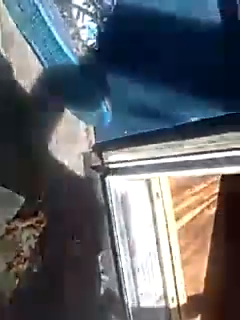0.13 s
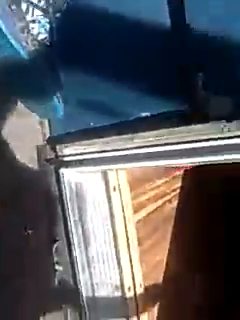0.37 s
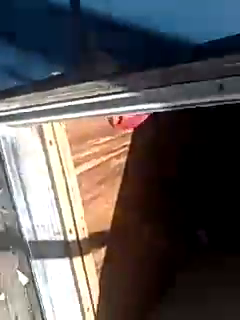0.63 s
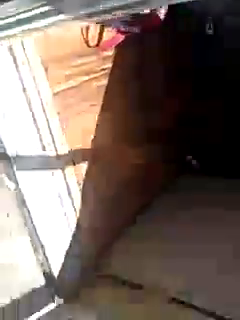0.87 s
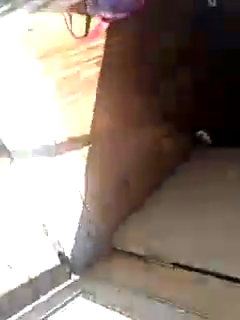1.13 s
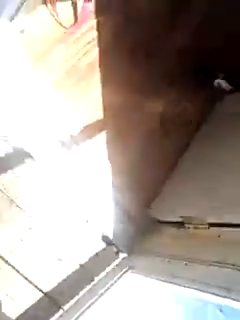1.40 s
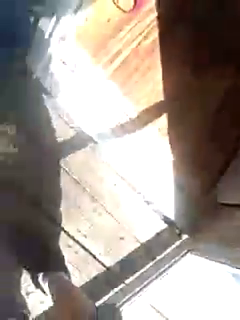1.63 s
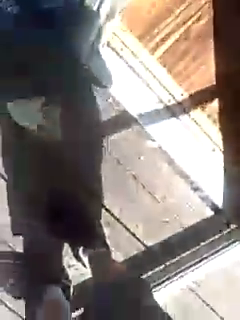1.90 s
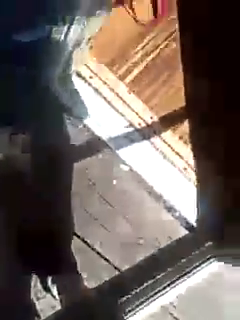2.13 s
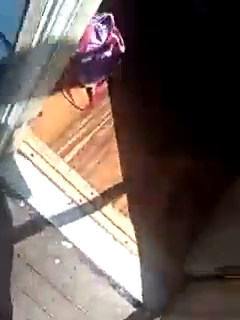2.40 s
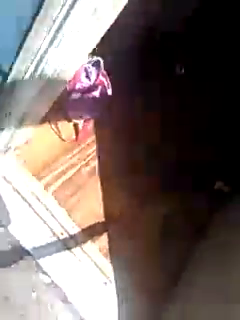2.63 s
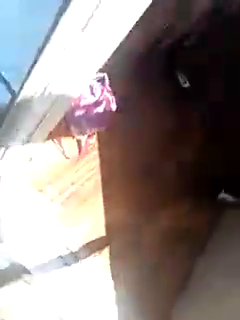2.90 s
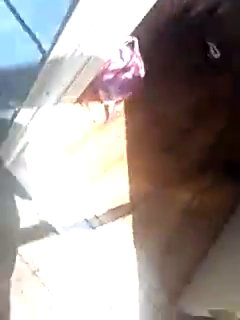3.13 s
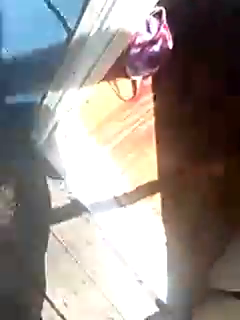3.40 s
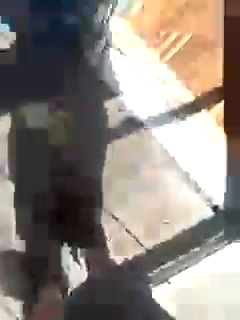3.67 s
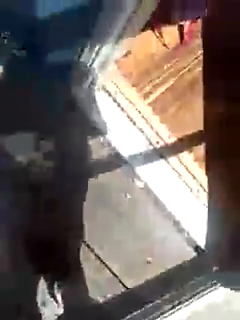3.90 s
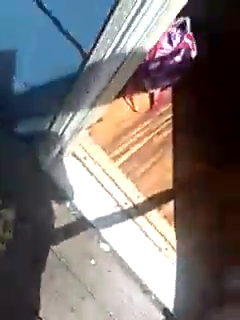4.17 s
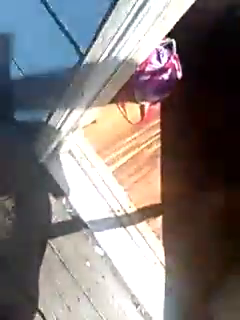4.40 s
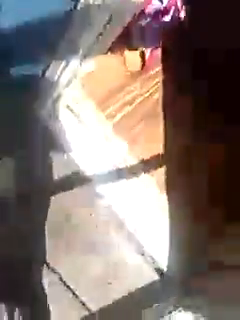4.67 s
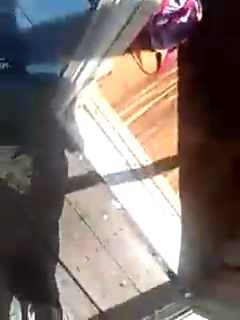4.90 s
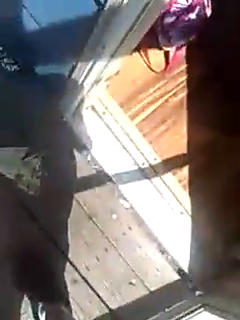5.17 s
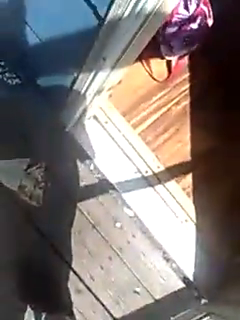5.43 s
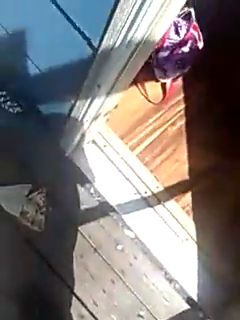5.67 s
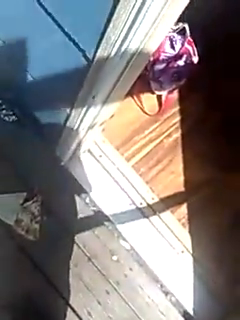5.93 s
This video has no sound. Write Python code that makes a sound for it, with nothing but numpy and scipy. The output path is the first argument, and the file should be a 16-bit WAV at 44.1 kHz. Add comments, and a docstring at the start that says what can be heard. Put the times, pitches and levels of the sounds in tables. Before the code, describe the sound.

A loud double-edged wooden door knock and brief latch rattle, then fingers scraping, ticking, creaking and thumping on a handheld phone over low hum.

```python
"""Fingers rub, tick, creak and press on the case of a handheld phone, by its microphone port, as it is carried
across a wooden doorway. Rubbing is gritty noise, ticks are filtered bursts, presses are slowing swings and
creaks are trains of slips. Steady tones and wavering noise bands make a low hum underneath; ringing modes make
the door's knocks and its latch. The microphone is mono and overloads on the hardest presses. In patches, the
noisy treble differs between left and right."""
import sys
import numpy as np
from scipy import signal
from scipy.fft import rfft, irfft
from scipy.io import wavfile
from scipy.ndimage import uniform_filter1d, minimum_filter1d

SR = 44100
rng = np.random.default_rng(int(sys.argv[2]) if len(sys.argv) > 2 else 0)


def gain_from_db(level_db):
    """Convert decibel levels to linear amplitude factors (20 dB per decade)."""
    decades = np.asarray(level_db, float) / 20
    return 10 ** decades


def wav_record(signal):
    """Record a signal, one row per channel, as 16-bit PCM in the file named by sys.argv[1]."""
    frames = np.transpose(np.atleast_2d(signal))
    bounded = np.clip(frames, -1, 1)
    # unit amplitude maps onto the largest positive 16-bit level
    quanta = np.round(bounded * 32767).astype(np.int16)
    wavfile.write(sys.argv[1], SR, quanta)


N = 266708

# spectrum of the distant wash: f/Hz, relative level/dB
AIR_SPECTRUM = [(60, -34), (130, -1.5), (300, -3), (600, -9.5), (1200, -10.5), (2200, -57), (2700, -22),
                (7000, -23), (10000, -37), (15000, -59)]
# wavering machine hum: f/Hz, width/Hz, rms level/dB before the swell, steady tone's amplitude against the waver
HUM_BANDS = [(58.3, 11.7, -29.5, 0.5), (94.9, 2.6, -29.5, 1.33), (114.3, 6.6, -37.5, 0.089),
             (183.5, 8.3, -48.5, 0.084), (228.5, 1.9, -45, 1.7), (280.3, 6.2, -46.5, 0.19),
             (337, 4.6, -49, .1)]
# the hum swells as the phone turns: t/s, level/dB
HUM_SWELL = [(0, -4.5), (.7, 0), (1.4, -1.5), (2, -2), (2.8, 0), (3.6, -1), (4.3, -2), (5, 0.5), (5.5, 1.5),
             (6.05, -2.5)]
# spectrum of rubbing at the port: f/Hz, relative level/dB
HISS_SPECTRUM = [(1470, -4.5), (2500, -9), (3560, -2.5), (4760, -3), (5660, -0.5), (6630, 0), (7400, -3.5),
                 (8300, -10.5), (10100, -17.5), (13700, -23.5), (14700, -27), (15000, -76)]
# spectrum of rubbing through the case: f/Hz, relative level/dB
SCRAPE_SPECTRUM = [(250, 12), (500, 4), (900, 1.5), (1220, -2.5), (1600, -3.5), (2200, -1.5), (2900, -21.5),
                   (5000, -35)]
# finger strokes on the case: start t/s, length/s, loudest hiss level/dB, loudest scrape level/dB,
# swell from start to end/dB
STROKES = [(0.34, .05, -55, -29, 0), (0.465, 0.11, -42, -20.5, -21), (0.858, 0.019, -41, -29, 0),
           (0.879, 0.086, -28, -36, -11), (0.97, 0.057, -39, -30, -6.5), (1.183, 0.15, -45.5, -36, -5.5),
           (1.359, 0.17, -41, -44.5, -2), (1.518, 0.1, -33.5, -33.5, 17), (1.6, 0.13, -41, -40, -6),
           (2.123, .06, -45, -58, -1), (2.227, 0.1, -43, -43, -4.5), (2.349, 0.073, -29.5, -28, 15),
           (2.436, 0.063, -40, -35, -2.5), (2.53, 0.1, -30, -41, 1.5), (2.643, 0.044, -41, -34, -1),
           (2.698, 0.098, -27.5, -36, 6.5), (2.798, 0.08, -30.5, -34, 3), (2.916, 0.049, -37, -36, -5),
           (3.015, 0.071, -47, -33.5, -3.5), (3.084, 0.12, -30.5, -31, 17.5), (3.2, 0.11, -33, -35, -13),
           (3.287, 0.29, -31, -30.5, 7.5), (3.459, 0.089, -29, -25, -1), (3.557, 0.044, -19, -23, -1),
           (3.609, 0.019, -17, -17, 5), (3.636, 0.059, -32.5, -62, -6.5), (3.752, .06, -39.5, -47, 9),
           (3.863, .1, -48, -60, -7), (4.205, 0.089, -40, -55, 5), (4.273, 0.095, -37.5, -62, -11.5),
           (4.436, 0.15, -33.5, -50, -2.3), (4.572, 0.053, -21, -28, 12.5), (4.61, 0.08, -29, -50, -26),
           (5.02, 0.16, -46, -64, 0), (5.181, 0.042, -19.5, -23, 24), (5.357, 0.011, -35, -36, -0.5),
           (5.47, 0.063, -62, -53, -2.5), (5.853, 0.081, -47.5, -43, 3)]
# how busy the carrying hand is: t/s, effort/dB
EFFORT = [(0, 5), (.39, -35), (.6, -13), (.99, 5), (1.18, -10), (1.55, 3), (1.75, 0.5), (2.05, -2.5),
          (2.3, 3.5), (2.76, 12), (3.03, 0.5), (3.18, 11), (3.27, 4), (3.4, 13.5), (3.59, 17), (3.72, 4),
          (4.58, 3), (4.78, 0.5), (5, 5.5), (5.5, -6), (5.81, 0), (6.05, 9.5)]
# spectrum of the hand's slow rumble: f/Hz, relative level/dB
RUMBLE_SPECTRUM = [(3, -12), (8, 11), (20, 24.5), (45, 8.5), (75, 18), (120, -52)]
# spectrum of the hand's dull body noise: f/Hz, relative level/dB
DULL_SPECTRUM = [(60, -9), (130, -1), (300, -5), (600, -11.5), (1200, -38)]
# faint hinge whistle: t/s, f/Hz, level/dB before flutter and fade
HINGE_WHISTLE = [(.19, 1640, -62), (.23, 1660, -54), (.29, 1680, -51), (.33, 1650, -60)]
# door knocks and bounces: t/s, wood peak level/dB, crack peak level/dB, low thud relative to wood/dB
KNOCKS = [(0.343, -23, -44, -4), (0.349, -13.5, -34, -3), (0.369, -25, -29, -11), (0.448, -10, -24, -20),
          (0.454, 2.5, -9, -5.5), (0.478, -8.5, -16, -10), (0.485, -17.5, -24, 5), (0.491, -20, -22.5, 7),
          (0.505, -15.5, -25.5, -11), (0.512, -32.5, -31, 18.5), (0.545, -25, -36, 6),
          (0.863, -22, -29, 0.5), (0.962, -22, -25.5, -11)]
# modes of the wood, four low ones first: f/Hz, relative level/dB, t60/s
DOOR_MODES = [(250, 0, .06), (340, -5, .06), (180, -8, .08), (460, -8, .04), (680, -8, .022),
              (900, -3, .022), (985, 1, .03), (1190, -4, .02), (2230, -9, .01), (3900, -9, .007)]
# latch rattles: t/s, peak level/dB
RATTLES = [(.8814, -15), (.9, -20), (.918, -23), (.937, -20), (.963, -28)]
# modes of the latch: f/Hz, relative level/dB, t60/s
LATCH_MODES = [(3908, -1, .19), (5572, -2, .12), (6304, -11, .1), (7063, 0, .14), (8936, -17, .12),
               (10410, -20, .15), (11640, -18, .1), (14000, -26, .1)]
# ticks of nail and skin on the case: t/s, snap peak level/dB, snap f/Hz, knock relative to snap/dB, knock f/Hz
TICKS = [(0.4482, -1.5, 3900, -8.5, 2180), (0.4535, -15, 4000, 10, 990), (.8645, -20.5, 4200, 0, 1380),
         (1.1957, -27.5, 3940, 1.5, 1250), (1.2155, -25.5, 4000, 1, 2270), (1.516, -19.5, 5200, -8, 1400),
         (1.5913, -28, 7400, 2, 1190), (1.6102, -12.5, 6660, -11, 1210), (1.6314, -17, 5060, -27, 1150),
         (2.3644, -26.5, 6230, -15, 961), (2.4117, -9.5, 5070, -7, 2270), (2.6572, -6.5, 6100, 2, 1800),
         (2.7279, -15.5, 6200, -4.5, 980), (2.824, -24.5, 5560, 2, 2330), (2.8325, -15, 5660, -3.5, 2010),
         (3.4472, -18, 3100, -0.5, 890), (3.459, -17.5, 6140, 4, 940), (3.5608, -6.5, 4640, -15, 982),
         (3.5667, -15.5, 6080, 2.5, 906), (3.5776, -3, 4240, -11, 1160), (3.594, -3, 5700, -3.5, 1110),
         (3.6017, -10, 6550, -18, 1190), (3.6113, -17, 5240, -1, 1030), (3.6191, -17, 6000, 10.5, 1110),
         (3.6215, -16.5, 6530, 5, 1190), (3.6236, -9, 6600, 13.5, 1085), (3.6303, -14.5, 6380, 6.5, 1190),
         (3.7309, -26.5, 6850, -22, 1040), (4.221, -37, 3600, -8, 974), (4.3082, -17.5, 6500, -30, 1170),
         (4.4636, -15.5, 3760, -5, 1170), (4.601, -17, 4370, -2, 1050), (4.609, -12, 5660, -27, 1190),
         (4.62, -18, 6400, -10, 1110), (5.2033, -13, 6800, -12, 2660), (5.2133, -15.5, 6590, -5, 1610),
         (5.2188, -16.5, 6750, 15, 1020), (5.365, -35, 6760, 2, 1080)]
# presses on the port: t/s, nominal pressure/full scales (push +, pull -), starting f/Hz,
# share of that frequency finally approached, t60/s
PRESSES = [(.893, 0.33, 42, 0.39, 0.31), (1.47, 0.12, 15, .9, 0.38), (1.86, 0.2, 24, 0.82, 0.11),
           (2.159, 0.3, 23.5, 0.86, 0.78), (2.358, -.75, 220, .13, .12), (2.654, -1, 96, 0.11, 0.4),
           (2.846, -0.8, 45, 0.039, 0.26), (3.251, 0.6, 20, 0.84, 0.27), (3.335, 0.36, 19, .9, 0.23),
           (3.39, 1.08, 2.1, 1, 1.9), (3.558, -1, 66, .45, .5), (3.633, -2.24, 310, .54, 0.013),
           (3.638, -.68, 4.4, .36, .68), (3.796, 1.1, 64, .98, 0.024), (3.896, 0.4, 32, 0.86, 0.13),
           (4.59, 0.45, 45, 0.076, 0.63), (5.218, 3.06, 104, 0.068, .17), (5.222, -2.5, 325, 0.54, 0.016),
           (5.93, 0.43, 73, 0.14, 0.67)]
# skin creaking in slips, one table a creak: t/s, mean rate/slips a second, highest slip level/dB
CREAKS = [
    [(2.72, 119, -9), (2.745, 154, -3), (2.78, 136, -11.5)],
    [(3.385, 61, -8), (3.43, 101, -2), (3.48, 170, 3), (3.51, 162, 6), (3.535, 187, -2.5)],
]
# modes of the case: f/Hz, relative level/dB, t60/s
CASE_MODES = [(960, -6, 0.023), (1140, 35, 0.017), (1670, -38, 0.075), (2040, -23, 0.019)]
# a finger seals the port: t/s, length/s before 90 extra samples, treble loss/dB
SEALS = [(3.572, 0.0055, 17), (3.581, 0.0035, 16), (5.223, 0.03, 20)]
# spread of the treble: f/Hz, chance that a patch differs left and right
APART = [(3800, 0.0038), (4500, 0.093), (7000, 0.29), (10000, .75), (14000, 0.57)]
# top edge of the microphone path: f/Hz, level/dB
TOP_EDGE = [(14100, 0), (14500, -31)]


def read(points, hz):
    """Reads a spectrum on a log-frequency axis."""
    f, value = np.transpose(points)
    return np.interp(np.log(hz + 1), np.log(f + 1), value)


def along(rows):
    """Joins curve rows into one value a sample for every column after the time."""
    s, *columns = np.transpose(rows)
    return [np.interp(np.arange(N) / SR, s, c) for c in columns]


def evened(x):
    """Scales to rms 1."""
    return x / np.sqrt(np.mean(x ** 2) + 1e-20)


def add(mix, s, sound):
    """Mixes a sound in at s seconds."""
    part = mix[round(s * SR):][:len(sound)]
    part += sound[:len(part)]


def coloured(x, spectrum):
    """Shapes x by a spectrum, rms 1."""
    gain = gain_from_db(read(spectrum, np.fft.rfftfreq(N, 1 / SR)))
    return evened(irfft(rfft(x) * gain, N))


def patchy(patchy_db):
    """White noise whose level drifts in patches of time and frequency."""
    a, b, patches = rng.standard_normal((N // 128 + 5, 257, 3)).T
    patches = uniform_filter1d(patches, size=10, axis=0)  # smooth over frequency
    patches = evened(uniform_filter1d(patches, size=12, axis=1))  # smooth over time
    return signal.istft((a + 1j * b) * gain_from_db(patchy_db * patches), nperseg=512, noverlap=384)[1][:N]


def ring(modes, spread):
    """One blow on a set of decaying modes, each struck and tuned a little differently; peak 1."""
    t = np.arange(SR // 4) / SR
    chance = rng.standard_normal((len(modes), 2))
    out = np.zeros(len(t))
    for (hz, db, t60), (strength, detune) in zip(modes, chance):
        fade = gain_from_db(db + 3 * strength - 60 * t / t60)  # 3 dB of scatter in strength
        out += fade * np.sin(2 * np.pi * hz * (1 + spread * detune) * t)
    return out / abs(out).max()


def puff(hz, width, t60):
    """A burst of noise around hz that dies quickly; peak 1."""
    t = np.arange(SR // 20) / SR
    burst = rng.standard_normal(len(t)) * gain_from_db(-60 * t / max(t60, .002))
    burst = signal.lfilter(*signal.butter(2, 9500, fs=SR), burst)  # the very top of each burst is dulled
    peak = signal.iirpeak(hz, hz / width, SR)
    resonant = signal.lfilter(*peak, signal.lfilter(*peak, burst))
    out = resonant + 0.027 * burst  # steep resonance over a thin broad click
    return out / abs(out).max()


def air():
    """Distant wash and a hum of steady tones with narrow wavering noise bands around them."""
    hz = np.fft.rfftfreq(N, 1 / SR)
    spectrum = rfft(rng.standard_normal(N))
    t = np.arange(N) / SR
    hum = np.zeros(N)
    for f, width, db, tone in HUM_BANDS:
        waver = evened(irfft(spectrum / (1 + ((hz - f) / width * 2) ** 2), N))
        hum += gain_from_db(db) * evened(waver + tone * np.sin(2 * np.pi * f * t))
    wash = gain_from_db(-42.5) * coloured(patchy(patchy_db=3.5), AIR_SPECTRUM)
    return hum * gain_from_db(along(HUM_SWELL)[0]) + wash


def strokes():
    """Power of hiss and of scrape: each stroke swells or sinks evenly between soft ends, over the grip."""
    # the resting grip never stops whispering: hiss dB, scrape dB, and dB gained per dB of effort
    grip_db, grip_follows = np.array([[-52.5], [-45]]), 0.1
    shortest_fade_s, touch_share, lift_share = 0.012, 0.37, 0.33  # shares of the stroke's length
    power = gain_from_db(2 * (grip_db + grip_follows * along(EFFORT)[0]))
    for s, length, hiss_db, scrape_db, swell_db in STROKES:
        touch = shortest_fade_s + touch_share * length
        lift = shortest_fade_s + lift_share * length
        t = np.arange(-touch / 2, length + lift / 2, 1 / SR)
        fade = np.minimum(.5 + t / touch, .5 + (length - t) / lift)
        ends = np.sin(np.pi / 2 * np.clip(fade, 0, 1)) ** 2
        shape = ends * gain_from_db(swell_db * np.clip(t / length, 0, 1) - max(swell_db, 0))
        add(power[0], s - touch / 2, (gain_from_db(hiss_db) * shape) ** 2)
        add(power[1], s - touch / 2, (gain_from_db(scrape_db) * shape) ** 2)
    return power


def rubbing():
    """Skin catches in tiny grains: gritty noise heard as hiss at the port and scrape through the case."""
    hiss, scrape = np.sqrt(strokes())
    grit = gain_from_db(1.3 * evened(uniform_filter1d(rng.standard_normal(N), size=70)))
    noise = patchy(patchy_db=2.5) * grit
    return hiss * coloured(noise, HISS_SPECTRUM) + scrape * coloured(noise, SCRAPE_SPECTRUM)


def sway():
    """Slow rumble and dull body noise of the moving hand, both following its effort."""
    effort_db = along(EFFORT)[0]
    rumble = gain_from_db(-28 + effort_db) * coloured(rng.standard_normal(N), RUMBLE_SPECTRUM)
    # the dull noise gains only 0.23 dB per dB of effort
    dull = gain_from_db(-38 + 0.23 * effort_db) * coloured(patchy(patchy_db=1.5), DULL_SPECTRUM)
    return rumble + dull


def hinge():
    """A faint gliding sine whistle with an unsteady level, faded at both ends."""
    hz, db = along(HINGE_WHISTLE)
    inside = slice(round(HINGE_WHISTLE[0][0] * SR), round(HINGE_WHISTLE[-1][0] * SR))
    flutter = 1 + .9 * evened(uniform_filter1d(rng.standard_normal(N), size=350))
    whistle = gain_from_db(db) * flutter * np.sin(2 * np.pi * np.cumsum(hz) / SR)
    out = np.zeros(N)
    out[inside] = whistle[inside] * np.hanning(inside.stop - inside.start) ** 0.5
    return out


def knocks():
    """Knocks ring the wood, low modes by their own share, under a short noisy crack."""
    out = np.zeros(N)
    for s, db, crack_db, thud_db in KNOCKS:
        add(out, s, gain_from_db(db) * ring(DOOR_MODES[4:], spread=0.026))
        add(out, s, gain_from_db(db + thud_db) * ring(DOOR_MODES[:4], spread=0.022))
        add(out, s, gain_from_db(crack_db) * puff(3560, width=1700, t60=0.012))
    return out


def latch():
    """The latch's metal modes ring at each rattle, with a burst of noise."""
    out = np.zeros(N)
    for s, db in RATTLES:
        add(out, s, gain_from_db(db) * ring(LATCH_MODES, spread=.002))
        add(out, s, gain_from_db(db - 2.5) * puff(4400, width=2300, t60=0.045))
    return out


def hall(x):
    """Adds the hall's answer: a decaying noise tail that starts after 4 ms."""
    level_db, t60_s = -13.5, 0.17
    t = np.arange(SR // 4) / SR
    tail = rng.standard_normal(len(t)) * gain_from_db(-60 * t / t60_s) * (t > .004)
    tail = signal.lfilter(*signal.butter(2, 650, fs=SR), tail)  # walls swallow the treble
    return x + gain_from_db(level_db) * signal.oaconvolve(x, tail / np.linalg.norm(tail))[:N]


def door():
    """Hinge, wood and latch sound together into the hall."""
    return hall(hinge() + knocks() + latch())


def ticks():
    """Each is a bright snap over a duller knock of the case, both resonant noise bursts."""
    out = np.zeros(N)
    for s, db, hz, knock_db, knock_hz in TICKS:
        add(out, s, gain_from_db(db) * puff(hz, width=2860, t60=.009))
        add(out, s, gain_from_db(db + knock_db) * puff(knock_hz, width=600, t60=.016))
    return out


def presses():
    """Air trapped at the port swings, slowing as it leaks away."""
    pull_limit = .64  # full scales; the membrane travels less far outwards
    out, t = np.zeros(N), np.arange(SR // 4) / SR
    end_fade = signal.windows.tukey(2 * len(t), .3)[len(t):]
    for s, pressure, hz, share, t60 in PRESSES:
        turns = hz * t * (share + (1 - share) / (1 + t * hz * 0.97))
        swing = np.sin(2 * np.pi * np.minimum(turns, 2))  # over after two swings
        swing *= 1 - np.exp(-9 * hz * t)  # soft start
        add(out, s, pressure * gain_from_db(-60 * t / t60) * swing * end_fade)
    return np.where(out < 0, pull_limit * np.tanh(out / pull_limit), out)


def creaks():
    """Each uneven slip pulls a short dip of pressure and taps the case."""
    train = np.zeros(N)
    for rows in CREAKS:
        rate, db = along(rows)
        inside = slice(round(rows[0][0] * SR), round(rows[-1][0] * SR))
        uneven = evened(uniform_filter1d(rng.standard_normal(N), size=250))
        pace = rate[inside] * (1 + 0.5 * uneven[inside])
        at = inside.start + np.flatnonzero(np.diff(np.floor(np.cumsum(pace) / SR)) > 0)
        train[at] = gain_from_db(db[at] - 6.1 * rng.random(N)[at])
    u = np.arange(600) / SR / .0006  # time in units of 0.6 ms
    dip = -(u / 2) ** 2 * np.exp(2 - u)
    rebound = .12 * (u / 7) ** 4 * np.exp(4 - 4 * u / 7)
    tap = gain_from_db(-17.5) * ring(CASE_MODES, spread=0.011)[:600]
    return signal.oaconvolve(train, dip + rebound + tap)[:N]


def seal(heard):
    """A finger over the port mutes what lies above about 300 Hz."""
    loss_db = np.zeros(N)
    for s, length, db in SEALS:
        add(loss_db, s, db * signal.windows.tukey(round(length * SR) + 90, .3))
    low = signal.sosfiltfilt(signal.butter(2, 300, fs=SR, output="sos"), heard)
    return low + (heard - low) / gain_from_db(loss_db)


def scene():
    """Airborne sounds and the finger's noises pass the seal; pressure and hand motion bypass it."""
    heard = air() + door() + rubbing() + ticks()
    mono = seal(heard) + presses() + creaks() + sway()
    return np.array([mono, mono])


def apart(x):
    """Noisy treble patches become unrelated noise in each channel; clicks and clear tones stay centred."""
    hz, t, z = signal.stft(x, SR, nperseg=1024)
    # one draw per patch of two frames by 900 Hz
    chance = rng.random((len(t) // 2 + 1, 24))[np.arange(len(t)) // 2].T
    chance = chance[np.minimum(hz // 900, 23).astype(int)]
    power = uniform_filter1d(abs(z) ** 2, size=9, axis=1)
    treble = power[0, hz > 3000].sum(0)
    steady = treble < gain_from_db(17) * minimum_filter1d(treble, size=5)  # no click nearby
    peaks = 1. * (abs(z[0]) ** 2 > 4.3 * power[0])
    plain = uniform_filter1d(peaks, size=9, axis=0) < 1e-6  # no clear tone nearby
    a, b = rng.standard_normal((len(t), len(hz), 2, 2)).T
    share = read(APART, hz) * (hz > APART[0][0])
    turned = (chance < share[:, None]) & steady & plain
    mixed = np.where(turned, np.sqrt(power) * (a + 1j * b), z)
    return signal.istft(mixed * gain_from_db(read(TOP_EDGE, hz))[:, None], SR, nperseg=1024)[1][:, :N]


def band_limit(x):
    """A steep low-pass at the top of the band."""
    return signal.sosfilt(signal.butter(12, 15320, fs=SR, output="sos"), x)


def record(dry):
    """The capsule overloads with a hard knee just below full scale; patches of noisy treble then differ between
    channels."""
    knee = dry / (1 + abs(dry / .99) ** 8) ** (1 / 8)
    mix = apart(knee)
    return band_limit(mix)


dry = scene()
out = record(dry)
wav_record(out)
```